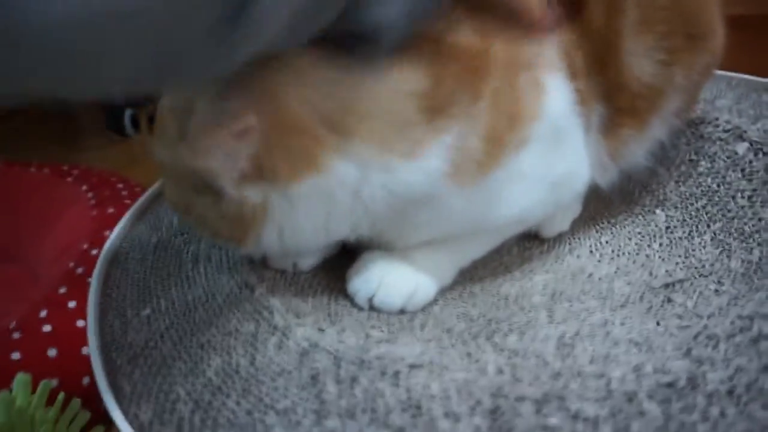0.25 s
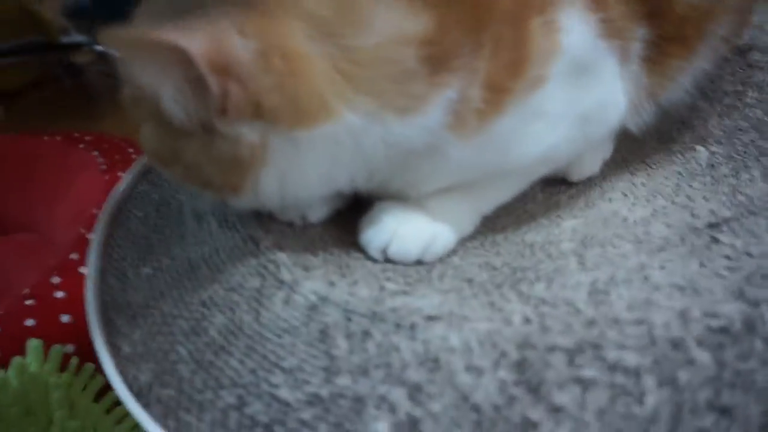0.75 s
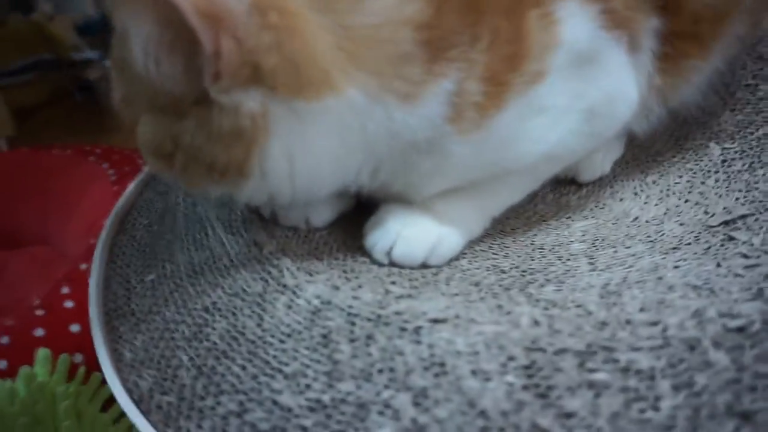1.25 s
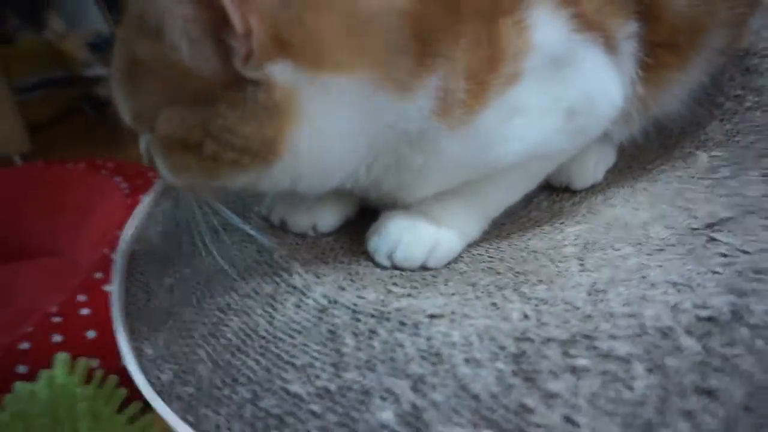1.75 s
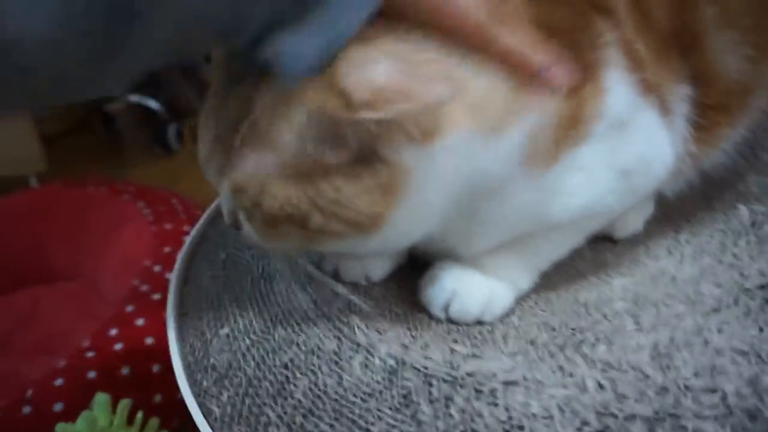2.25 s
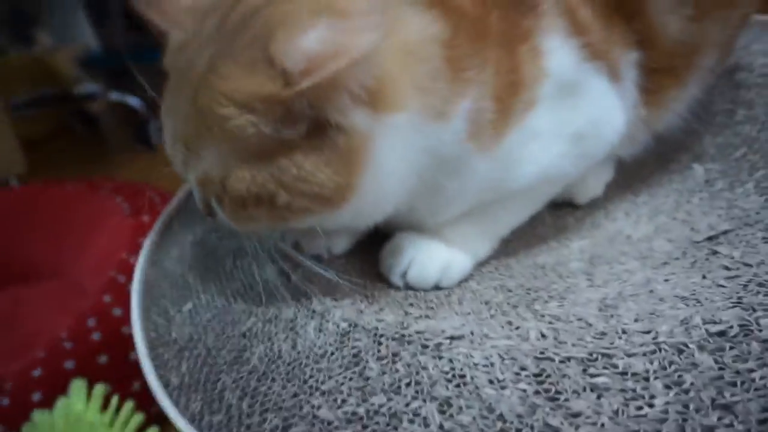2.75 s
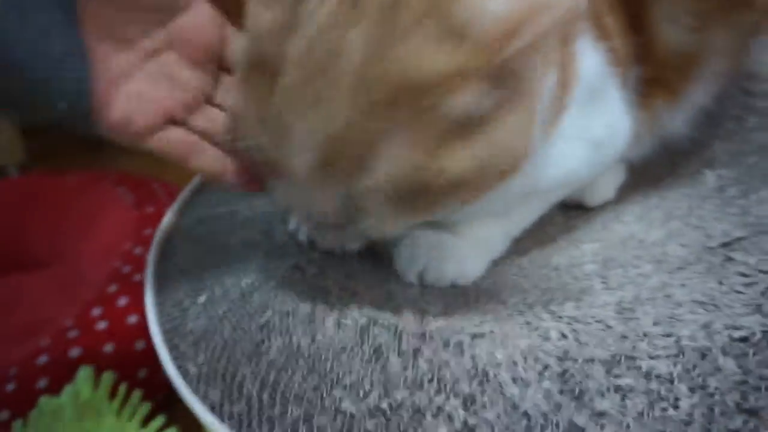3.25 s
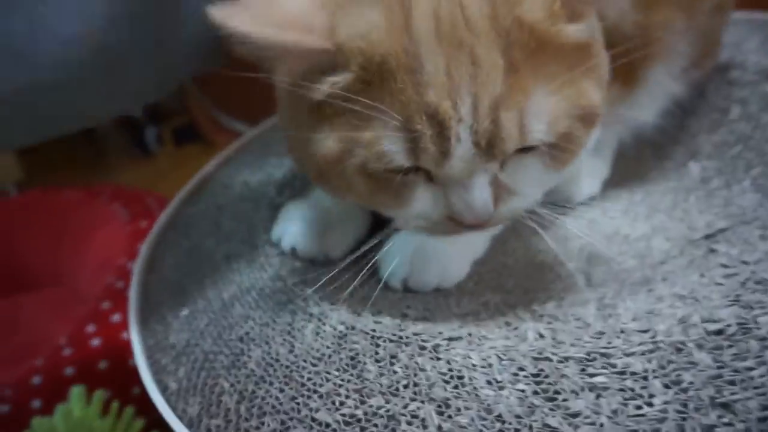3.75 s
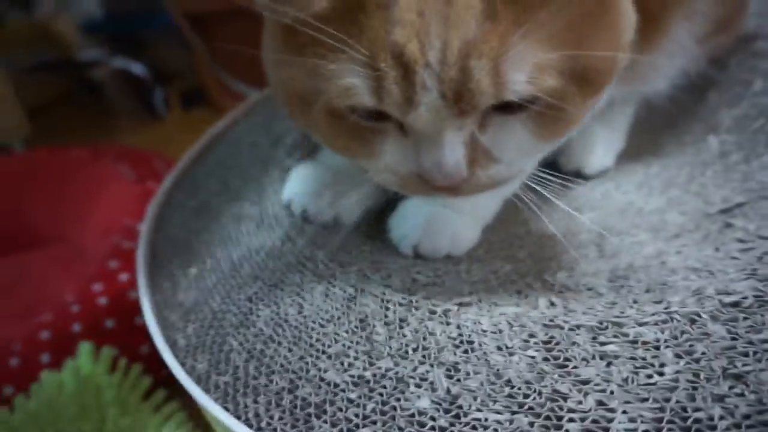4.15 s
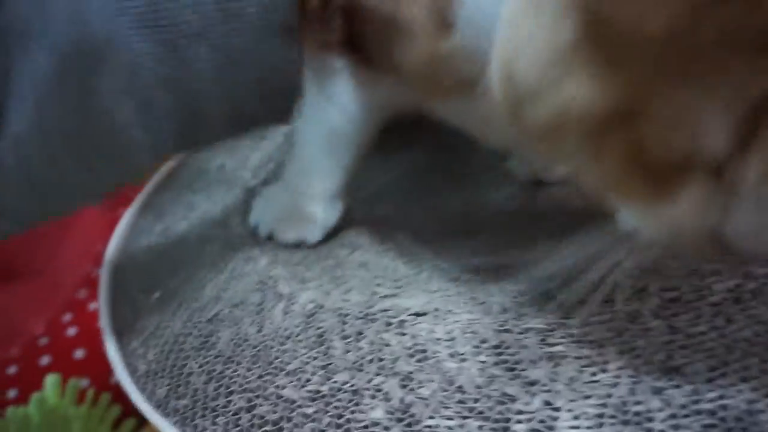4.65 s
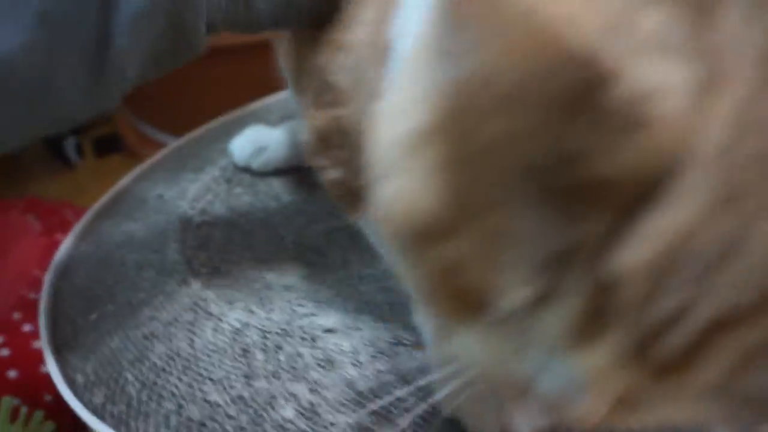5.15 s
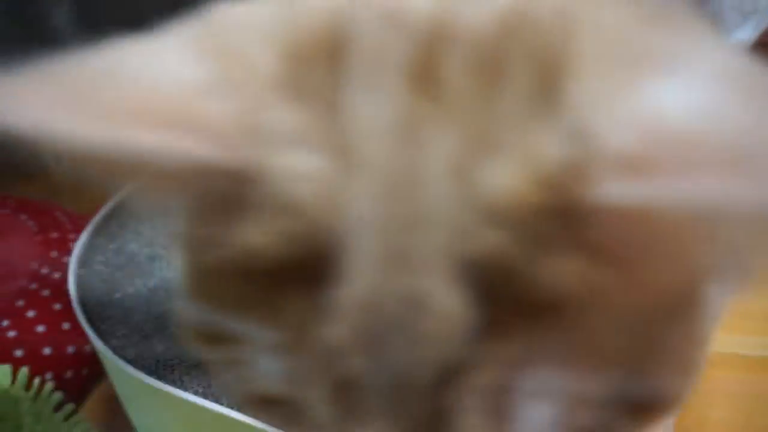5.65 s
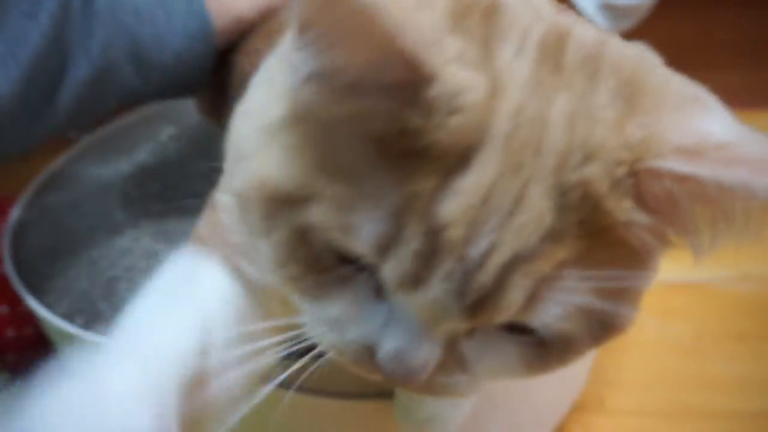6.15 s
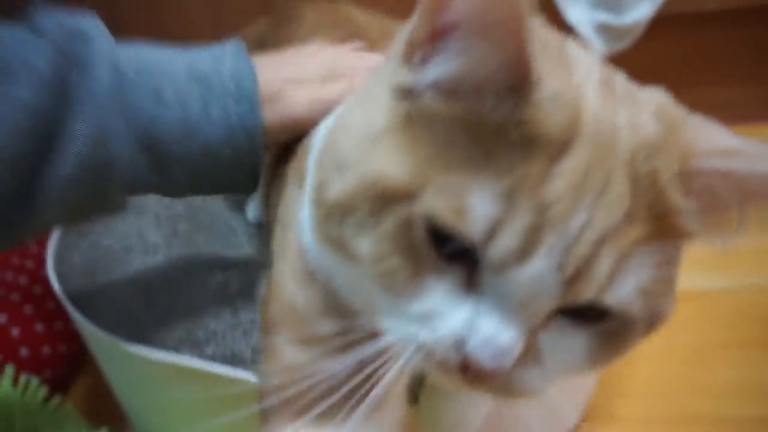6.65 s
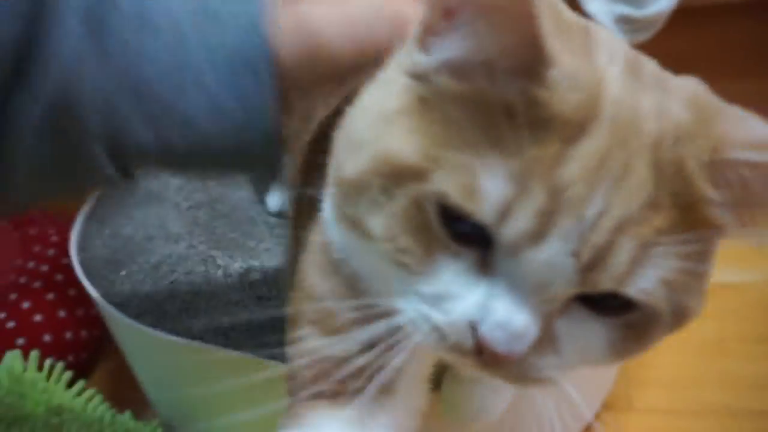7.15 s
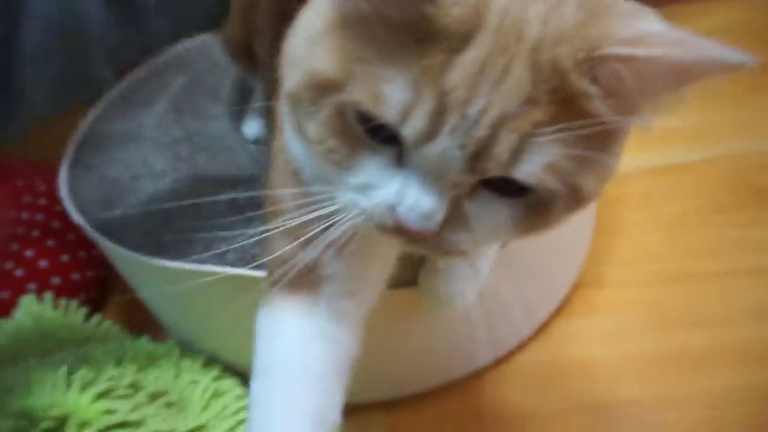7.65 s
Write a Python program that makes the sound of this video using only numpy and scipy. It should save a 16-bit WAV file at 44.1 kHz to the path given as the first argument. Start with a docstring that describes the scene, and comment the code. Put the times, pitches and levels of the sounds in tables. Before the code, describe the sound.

Dry plastic creaks and sharp snaps crackle in uneven bursts close to the microphone, with light ticks, soft fur rustles and padded bumps indoors.

```python
"""Cat petted on a cardboard scratcher

Dry stick-slip creaks and snaps, most likely of a handheld camera's plastic housing, excite the same few body modes
with different strengths at two microphone ports. Lighter ticks ring with random mode strengths, paw bumps are
resonant noise bursts, fur and sleeve rustle as swelling coloured noise, all over a faint room tone with hum.
Clicks leave a short rattle and a weak room echo."""
import sys
import numpy as np
from scipy import signal
from scipy.fft import rfft, irfft
from scipy.io import wavfile
from scipy.ndimage import uniform_filter1d

SR = 44100
rng = np.random.default_rng(int(sys.argv[2]) if len(sys.argv) > 2 else 0)


def persist_wave(psi):
    """Save psi, clipped to +-1, as 16-bit WAV."""
    counts = np.round(np.clip(psi, -1, 1) * 32767).astype(np.int16)
    wavfile.write(sys.argv[1], SR, np.atleast_2d(counts).T)


N = 347949

TOP_HZ = 11000
CONTACT_S = 0.004  # micro-slips reach this far before and after the main slip


def undb(db):
    """Decibels to gain."""
    return 10 ** (np.asarray(db) / 20)


def unit(x):
    """Scale to a mean energy of one per channel."""
    energy = np.sum(x ** 2, axis=-1)
    return x / np.sqrt(np.mean(energy))


def add(out, start_s, sound):
    """Mix a sound into out, no earlier than its first sample."""
    i = max(int(round(start_s * SR)), 0)
    part = sound[..., :max(N - i, 0)]
    out[..., i:i + part.shape[-1]] += part


def walk(rate_hz):
    """Smooth random wander with a spread near one: held noise, averaged twice."""
    hold = max(int(SR / rate_hz), 2)
    steps = np.repeat(rng.standard_normal(N // hold + 1), hold)
    smooth = uniform_filter1d(uniform_filter1d(steps, hold), hold)
    return 1.3 * smooth[:N]


def stereo_noise(size, width):
    """White noise at two ports; width is the side share against the mid."""
    mid, side = rng.standard_normal((2, size))
    return np.array([mid + width * side, mid - width * side])


def coloured(points, width):
    """Stereo noise of rms one, shaped by a spectrum of (frequency [Hz], relative level [dB])."""
    hz, db = np.transpose(points)
    bin_hz = np.maximum(np.fft.rfftfreq(N, 1 / SR), 1)
    gain = undb(np.interp(np.log(bin_hz), np.log(hz), db))
    noise = irfft(rfft(stereo_noise(N, width)) * gain, N)
    return noise / noise.std()


def ring(hz, width_hz):
    """Impulse response of one mode, gain one at its centre before the cut at 35 ms."""
    impulse = signal.unit_impulse(int(0.035 * SR))
    b, a = signal.iirpeak(hz, hz / width_hz, fs=SR)
    return signal.lfilter(b, a, impulse)


def gritty(sound, grit, grit_ms):
    """A rough contact lets go in micro-slips round the main one; they build faster than they die."""
    half = int(CONTACT_S * SR)
    t_ms = 1000 * np.arange(-half, half + 1) / SR
    crowd = np.exp(np.minimum(1.13 * t_ms, -t_ms) / grit_ms)
    micro_slips = unit(rng.standard_normal(len(t_ms)) * crowd)
    push = grit * micro_slips + (t_ms == 0)
    return signal.fftconvolve(sound, push[None], axes=-1)


def tail(x, db, t60_s, dull_hz):
    """Diffuse decay, different at the two ports: dying noise, low-passed."""
    t = np.arange(SR // 2) / SR
    onset = 1 - np.exp(-t / 0.0015)
    response = rng.standard_normal((2, len(t))) * undb(-60 * t / t60_s) * onset
    lowpass = signal.butter(2, dull_hz, fs=SR, output="sos")
    response = signal.sosfilt(lowpass, unit(response))
    return undb(db) * signal.fftconvolve(x, response, axes=-1)[:, :N]


def room_tone():
    """Still air as coloured noise, with the faint hum of an appliance as sines of wandering phase."""
    # air spectrum: (frequency [Hz], relative level [dB])
    air_points = [(25, -26), (70, -13.5), (120, -4.5), (200, -1.5), (320, 2), (500, 0.5), (850, -11.5),
                  (1300, -4.5), (2000, -3.5), (3000, -3), (5500, -11), (11000, -18)]
    # hum partials: (frequency [Hz], rms level [dB])
    hum_partials = [(120, -96), (178, -97), (474, -91)]
    t = np.arange(N) / SR
    hum = sum(np.sqrt(2) * undb(db) * np.sin(2 * np.pi * hz * t + 0.63 * walk(4.6))
              for hz, db in hum_partials)
    return undb(-75) * coloured(air_points, width=0.45) + hum


def rustle(rub_db, hiss_db, flicker_db, rest_db):
    """Fur, sleeve and paws brush along: strokes swell and fade as a dull rub and a fine hiss, both unsteady."""
    # strokes of hand, sleeve and fur: (middle [s], length [s], relative rub [dB], relative hiss [dB])
    strokes = [(0.0, 0.97, -76, -80), (1.327, 2, -74.5, -75.5), (1.998, 0.58, -62, -59.5),
               (2.46, 1.16, -66.5, -65.5), (2.885, 0.86, -63, -67.5), (3.652, 1.21, -76, -77.5),
               (5.029, 0.53, -65, -70), (5.7, 1.35, -71.5, -74), (6.602, 1.065, -70, -72),
               (7.802, 1.542, -76, -89)]
    # rub spectrum: (frequency [Hz], relative level [dB])
    rub_points = [(90, -23.5), (200, -14), (350, -9), (520, -1), (750, -4), (1300, 3), (1900, -4.5),
                  (2450, -5), (3300, -18), (6000, -42.5)]
    # hiss spectrum: (frequency [Hz], relative level [dB])
    hiss_points = [(700, -27.5), (1700, 4), (2500, 2.5), (3800, 2), (5500, -4.5), (9500, 0.5),
                   (11500, -5.5)]
    t = np.arange(N) / SR
    swells = np.array([np.cos(np.pi * np.clip((t - middle_s) / length_s, -0.5, 0.5)) ** 2
                       for middle_s, length_s, _, _ in strokes])
    _, _, *levels_db = np.transpose(strokes)
    # overlapping strokes and the rest level add in power
    rub, hiss = np.sqrt(undb(rest_db) ** 2 + undb(levels_db) ** 2 @ swells ** 2)
    dull = rub * undb(rub_db + flicker_db * walk(25)) * coloured(rub_points, width=0.58)
    fine = hiss * undb(hiss_db + flicker_db * walk(40)) * coloured(hiss_points, width=0.92)
    return dull + fine


def bumps(width):
    """Padded paw blows: decaying noise through one broad resonance, twice, cut at 0.25 s."""
    # soft blows: (time [s], relative peak [dB], resonance [Hz], t60 of the push [s])
    blows = [(0.916, -63.5, 209, 0.0539), (1.272, -63, 231, 0.077), (1.71, -43.5, 903.2, 0.11),
             (2.535, -42.5, 1140, 0.24), (3.238, -54, 840, 0.19), (4.72, -54, 900, 0.0698),
             (4.838, -55.5, 400, 0.068), (5.107, -33.5, 1138, 0.037), (5.17, -68, 282, 0.51),
             (5.328, -56.5, 442.4, 0.2), (6.213, -53.5, 480.2, 0.35), (6.944, -51.5, 915, 0.14),
             (7.455, -51, 610, .05), (7.533, -43, 473, 0.054)]
    out = np.zeros((2, N))
    t = np.arange(SR // 4) / SR
    for start_s, db, hz, t60_s in blows:
        push = stereo_noise(len(t), width) * undb(-60 * t / t60_s)
        width_hz = min(470, 0.8 * hz)  # per pass
        b, a = signal.iirpeak(hz, hz / width_hz, fs=SR)
        thud = signal.lfilter(b, a, signal.lfilter(b, a, push))
        add(out, start_s, undb(db) * thud / abs(thud).max())
    return out


def faint_ticks(count, db, spread_db, low_db, high_db):
    """Rows of mostly faint ticks at random moments, of random level."""
    return [
        (when * N / SR, db + spread_db * size, low_db, high_db) for when, size in rng.random((count, 2))]


def ticks(rows, vary, width, left_db, grit, grit_ms):
    """Each tick scuffs another spot, so the modes come with new strengths and signs."""
    # tick modes: (frequency [Hz], width [Hz], relative level [dB])
    tick_modes = [(503, 510, -11), (784, 360, -6.5), (1007, 120, -5.5), (1335.8, 180, -1),
                  (1881.6, 420, -2), (2331.5, 480, -1), (2685, 200, -0.5), (2970, 470, -7), (3480, 180, -9),
                  (4490, 380, -12.5), (5760, 470, -5.5), (6850, 320, -1), (8490.2, 770, -10),
                  (9680, 2800, -2)]
    hz, _, db = np.transpose(tick_modes)
    rings = np.array([unit(ring(f, w)) for f, w, _ in tick_modes]) * undb(db)[:, None]
    band = np.digitize(hz, [1500, 5000])  # 0 lows, 1 mids, 2 treble
    cuts = [((500, 1700), "band"), ((1400, 5200), "band"), (4800, "high")]
    filters = [signal.butter(2, cut, kind, fs=SR, output="sos") for cut, kind in cuts]
    out = np.zeros((2, N))
    for start_s, mid_db, low_db, high_db in rows:
        sign, size, side = rng.standard_normal((3, len(hz)))
        # the ports differ more in the high modes
        apart = width * side * hz / (hz + 1500)
        shapes = np.sign(sign) * np.exp(vary * size) * np.array([1 + apart, 1 - apart])
        for k, band_db in enumerate([low_db, 0, high_db]):
            scuff = gritty((shapes * (band == k)) @ rings, grit, grit_ms)
            part = signal.sosfilt(filters[k], scuff)
            add(out, start_s - CONTACT_S, undb(mid_db + band_db) * unit(part))
    return out * undb([[left_db], [0]])


def after_ring(x):
    """Two lightly damped modes that outlast the snaps and creaks."""
    # lingering modes: (frequency [Hz], level [dB], t60 [s])
    long_modes = [(2296, -38, 0.3641), (2720, -33.5, 0.11)]
    t = np.arange(SR // 2) / SR
    response = sum(undb(db) * unit(np.sin(2 * np.pi * hz * t) * undb(-60 * t / t60_s))
                   for hz, db, t60_s in long_modes)
    return signal.fftconvolve(x, response[None], axes=-1)[:, :N]


def creak_slips(jitter, scatter_db):
    """Stick-slip at uneven intervals while the force swells and eases; a longer stick ends in a harder slip."""
    # runs of slips: (start [s], end [s], slip rate [1/s], relative crest level [dB],
    # place of the crest [0-1], relative drive of the high modes [dB])
    creak_runs = [(0.425, 0.47, 235, -28, 0.9, -25), (0.505, 0.586, 170, -16.5, .45, -8),
                  (0.6005, 0.628, 110, -14.5, 0.8, -11), (0.694, 0.752, 191, -11, 0.89, -7.5),
                  (1.171, 1.255, 174, -6, 0.68, -.5), (1.291, 1.325, 257, -20.5, 0.38, -11.5),
                  (1.38, 1.415, 266, -21, 0.35, -13), (1.85, 1.89, 289.67, -19, 0.72, -4),
                  (1.8956, 2.028, 215, -1.5, 0.1, 1.5), (2.032, 2.05, 151, -12, 0.01, -2.5),
                  (2.78, 2.817, 135, -1.5, 0.01, 4), (3.422, 3.44, 227.2, -14, 0.7, -17),
                  (3.846, 3.908, 208, -21, 0.54, -5), (4.918, 4.934, 210, -9.5, 0.63, -2.5),
                  (4.947, 5.006, 224, -4.5, 0, 0), (5.012, 5.044, 290, -20.5, 0.38, -3),
                  (5.098, 5.154, 196, -11.5, 0.52, -5), (5.539, 5.575, 147, -15.5, 0.8, -8),
                  (6.395, 6.407, 224, -4.5, 0.21, 11.5), (6.454, 6.487, 450, -10, 0.67, 5),
                  (6.496, 6.517, 163, -6, .3, 8.5), (6.6, 6.649, 221, -13.5, 0.84, 4.5),
                  (6.6634, 6.677, 162, -9.5, 0.87, -3), (7.388, 7.416, 160, -8.5, 0.52, -1)]
    rise_db, fall_db = 7, 9.5
    slips = []
    for start_s, end_s, rate_hz, top_db, crest, bright_db in creak_runs:
        chance = rng.standard_normal((64, 2))
        waits = np.exp(jitter * chance[:, 0])  # in mean slip periods, roughly
        times_s = start_s + (np.cumsum(waits) - waits[0]) / rate_hz
        place = (times_s - start_s) / (end_s - start_s)
        force_db = np.interp(place, [0, crest, 1], [-rise_db, 0, -fall_db])
        db = top_db + force_db + scatter_db * chance[:, 1] + 10 * np.log10(waits)
        slips += [(s, slip_db, bright_db) for s, slip_db in zip(times_s, db) if s < end_s]
    return slips


def housing(slips, vary, port_vary, grit, grit_ms, treble_db):
    """Every slip rings the same modes, a little differently each time; brighter ones drive the high modes harder."""
    # housing modes: (frequency [Hz], width [Hz], signed swing at left port, signed swing at right port)
    body_modes = [(718, 77, 0.18, 0.34), (1242, 128, -0.5, -1.0), (1453, 89, 2, 1.3), (1679, 177, 3.5, 3),
                  (1838, 242, -1.03, -3.5), (2005, 320, -6.5, -3.5), (2031, 63, 1, 2.5),
                  (2260, 109, 6, -1.5), (2340, 707, -1.13, 4), (2754, 205, 4.5, -2.5),
                  (2820, 40, -0.2, -2.5), (2974, 171, 4, 0.98), (3102, 251, 6.5, -13), (3151, 285, -7, 7.5),
                  (3800, 25, -2.7, 2), (3613, 220.52, 1.68, 2.5), (3980, 110, 0.13, -2),
                  (4270, 320, 3, -0.3), (4590, 81, -1.1, -0.36), (4696, 260, -1, -0.4),
                  (4960, 350, -0.47, 0.57), (5200, 300, -0.63, 0.91), (6040, 195, 0.1, 0.63),
                  (6480, 330, -0.66, 0.1), (7970, 762, 2.51, 4.01), (8001, 823, -3.01, -4.01),
                  (9301, 321, 1.98, 0.51), (9305, 436, -2.01, -0.78), (10790, 620, -0.75, -0.21),
                  (10455, 750, 0.74, 0.39)]
    hz, _, left, right = np.transpose(body_modes)
    rings = np.array([ring(f, width_hz) for f, width_hz, _, _ in body_modes])
    shapes = np.array([left, right])
    high = np.interp(hz, [2500, 8000], [0, 1])
    grid_hz = np.linspace(0, TOP_HZ, 12)
    out = np.zeros((2, N))
    for start_s, db, bright_db in slips:
        # the slipping spot shifts: neighbouring modes change alike, and lean to one port or the other
        chance = rng.standard_normal((2, len(grid_hz)))
        spot, lean = (np.interp(hz, grid_hz, row) for row in chance)
        change = np.exp(vary * spot + port_vary * np.array([lean, -lean]))
        drive = undb((bright_db + treble_db) * high) * change
        slip = gritty((shapes * drive) @ rings, grit, grit_ms)
        add(out, start_s - CONTACT_S, undb(db) * unit(slip))
    return out


def scene():
    """Snaps, creaks and ticks with their short rattle and weak room echo, over the soft sounds."""
    # single snaps and quick volleys: (time [s], relative energy [dB], relative drive of the high modes [dB])
    snap_rows = [(0.002, -2.5, -2.5), (0.3225, -3, 5), (0.412, -21.5, -18), (0.6543, -20.5, -17),
                 (0.8066, -9.5, -10.5), (0.9898, -9, -7.5), (1.5155, -13, -15.5), (1.5849, -16.5, -8),
                 (1.7207, -13, -15), (2.5621, -2.5, 1.5), (2.6463, -6, -11.5), (2.6803, 2, 0),
                 (2.693, 1.5, -9), (2.7053, 2.5, -0.5), (2.7287, -1, -13), (2.7428, 2.5, 5), (2.7525, 2, 4),
                 (2.7618, -2.5, 6), (2.7689, 2.5, 6), (2.872, -12, -4), (3.2037, 0, 6),
                 (3.3254, -6.5, -2.5), (3.3988, -14.5, -20), (3.4541, -4, -9), (3.4656, -3, -4),
                 (3.4766, -7.5, -6), (3.4856, -6.5, -2), (3.5109, -0.5, -1.5), (3.5237, -1, 0),
                 (3.5435, 0.5, 3), (3.5552, -5, -2), (3.837, -2.5, 3.5), (3.9188, -13.5, -7),
                 (4.1483, -11.5, -11.5), (4.1905, -16.5, -0.5), (4.3087, -3.5, 3.5), (4.3245, -9.5, 0),
                 (4.5028, -7.5, 1), (4.5334, -9.5, 0), (4.5577, -10.5, -6.5), (4.667, -2.5, 5),
                 (4.7966, -16.5, -22), (5.4455, -2.5, -1.5), (6.4506, 1.5, 6.5), (6.5708, -1.5, 7),
                 (6.5828, -5.5, 6), (6.6869, -5, -0.5), (6.6936, 0, 0), (6.7076, 1, 1.5), (7.3801, -4, 6),
                 (7.4164, -6, 1.5)]
    # lighter ticks: (time [s], relative mids [dB], lows minus mids [dB], treble minus mids [dB])
    tick_rows = [(0.8261, -18, -7.5, -17), (0.8703, -22, -29, -32), (1.5513, -20, -25, -26),
                 (1.6381, -14, -7.5, -25.5), (1.7088, -9.5, -6.5, -18.5), (2.0905, -15, -2.5, -11),
                 (2.4219, -3, -6.5, -10), (2.532, -16, 0, -17), (2.6402, -8, -10, -22),
                 (2.9682, -27.5, -6, -9), (3.0355, -24.5, -5, -6.5), (3.1702, -23, -12, -11.5),
                 (3.2357, -19, -9, -26), (3.3117, -19, -2.5, -21), (3.9237, -12, -12.5, -15),
                 (4.006, -29, 0, -20), (4.6921, -19.5, -7, -17), (4.699, -17, -4.5, -16),
                 (4.7682, -20, -1.5, -19), (5.73, -15.5, -12, -8.5), (6.118, -33, -8.5, -5),
                 (6.221, -27, 0, -19), (6.357, -17, -13.5, -9.5), (6.3814, -4.5, -12, -14),
                 (6.542, -19, -19, -17), (6.7529, -16.5, -24, -13), (6.7691, -12.5, -8.5, -15),
                 (6.8855, -26, -2, -17), (6.9144, -2.5, -15.5, -15.5), (7.0565, -24.5, -12.5, -12),
                 (7.1167, -7.5, -19, -14.5), (7.1301, -18.5, -6.5, -5), (7.4556, -5.5, -11, -13.5),
                 (7.4996, -23.5, -12, -0.5), (7.5347, -22.5, -5.5, -20), (7.6059, -22.5, -6, -25),
                 (7.8036, -25, -9, -20), (7.8428, -19, -6.5, -12)]
    snaps = undb(-0.1) * housing(snap_rows, vary=0.099, port_vary=0.097, grit=0.23, grit_ms=2.1,
                                 treble_db=0.8)
    slips = creak_slips(jitter=0.2, scatter_db=1.5)
    creaks = undb(0.5) * housing(slips, vary=0.28, port_vary=0.11, grit=0.63, grit_ms=2.8,
                                 treble_db=-1.0)
    tiny_rows = faint_ticks(count=90, db=-45.5, spread_db=13.5, low_db=-7, high_db=-18.5)
    light = undb(-1.24) * ticks(tick_rows + tiny_rows, vary=0.28, width=1.81, left_db=0.2,
                                grit=1.37, grit_ms=0.93)
    clicks = snaps + creaks + light
    rattle = tail(clicks, db=-11, t60_s=0.031, dull_hz=5500)
    echo = tail(clicks, db=-24.5, t60_s=0.3, dull_hz=4600)
    # a scuff drags on for a moment after the first touch
    drag = tail(light, db=-10.5, t60_s=0.063, dull_hz=8000)
    brush = rustle(rub_db=4.0, hiss_db=0.5, flicker_db=4.0, rest_db=-80)
    soft = undb(2.0) * bumps(width=0.26) + brush
    return clicks + rattle + echo + after_ring(snaps + creaks) + drag + soft + room_tone()


def record(dry):
    """The recorder cuts the top with a steep elliptic low-pass."""
    lowpass = signal.ellip(7, 0.3, 60, TOP_HZ, fs=SR, output="sos")
    return signal.sosfilt(lowpass, dry)


dry = scene()
out = record(dry)
persist_wave(out)
```